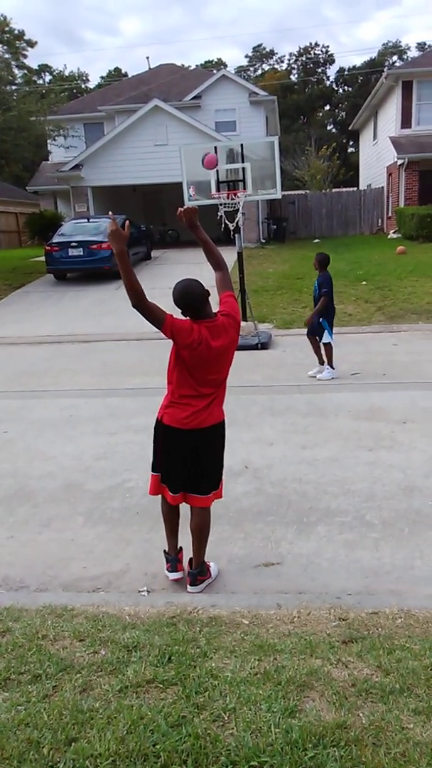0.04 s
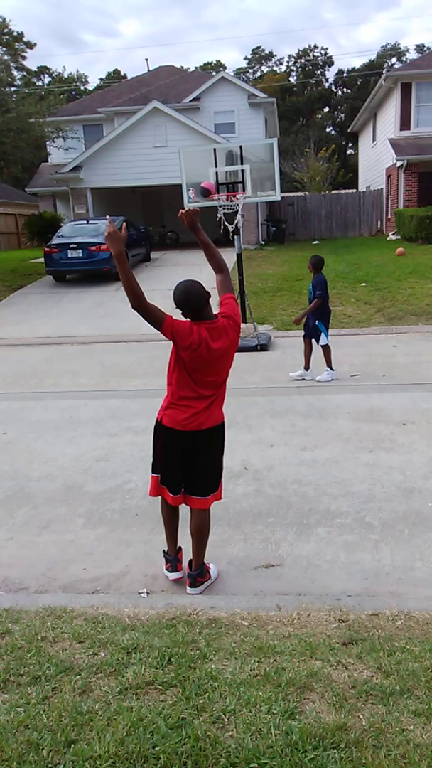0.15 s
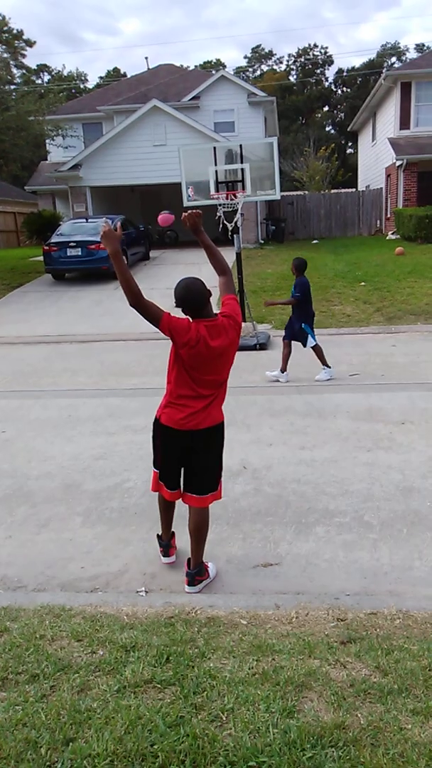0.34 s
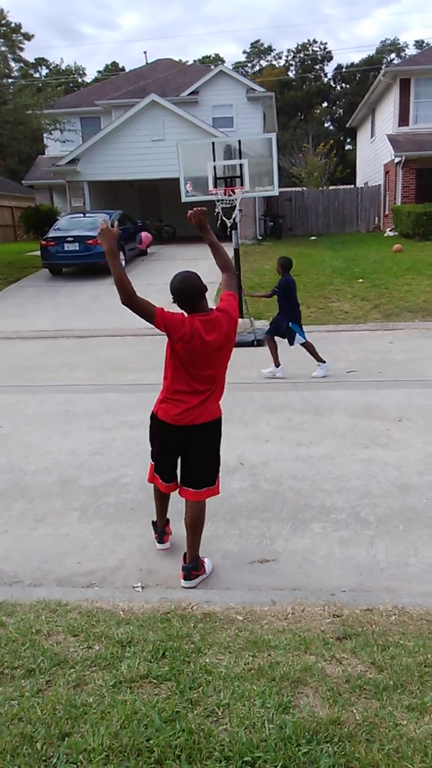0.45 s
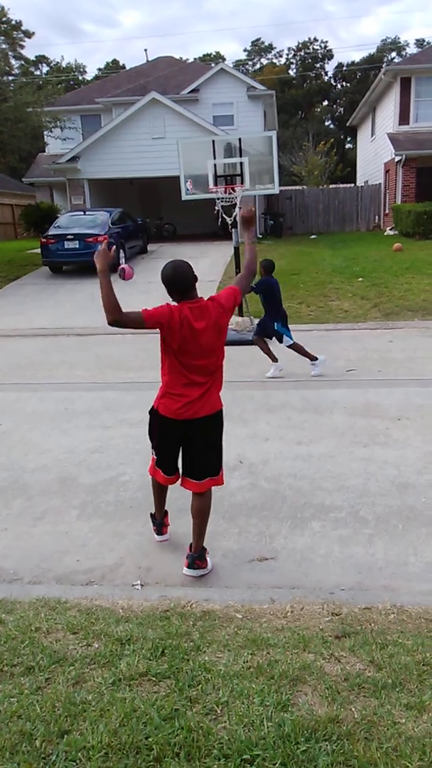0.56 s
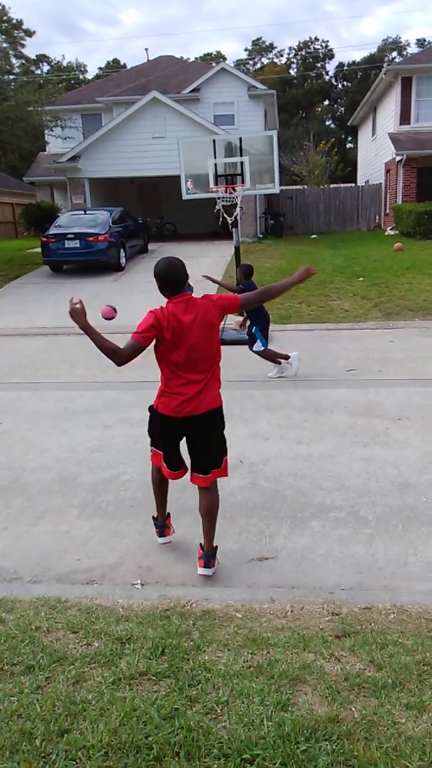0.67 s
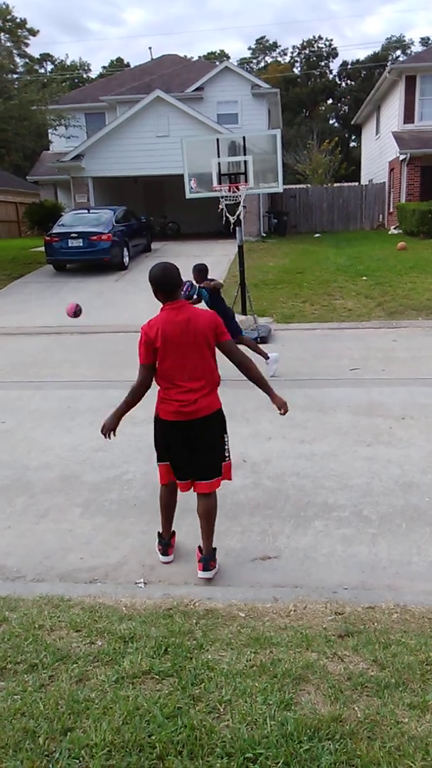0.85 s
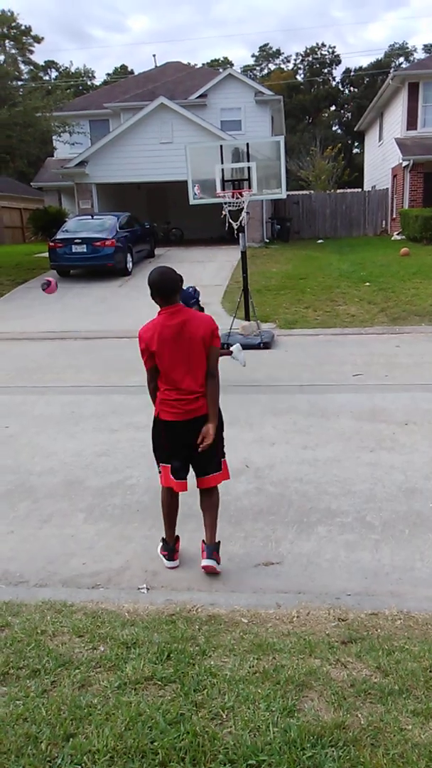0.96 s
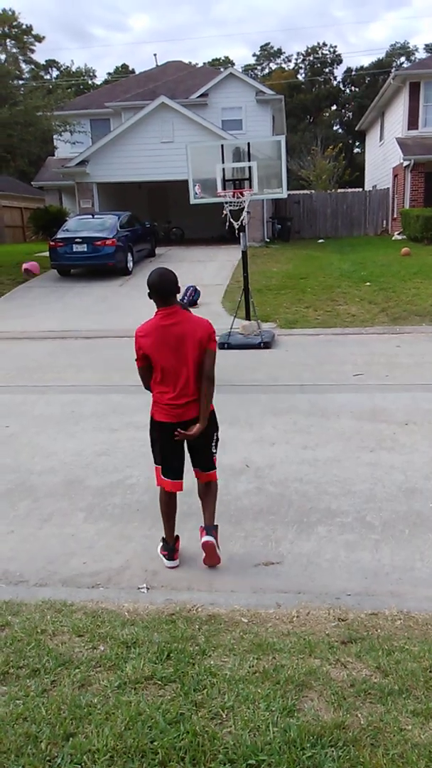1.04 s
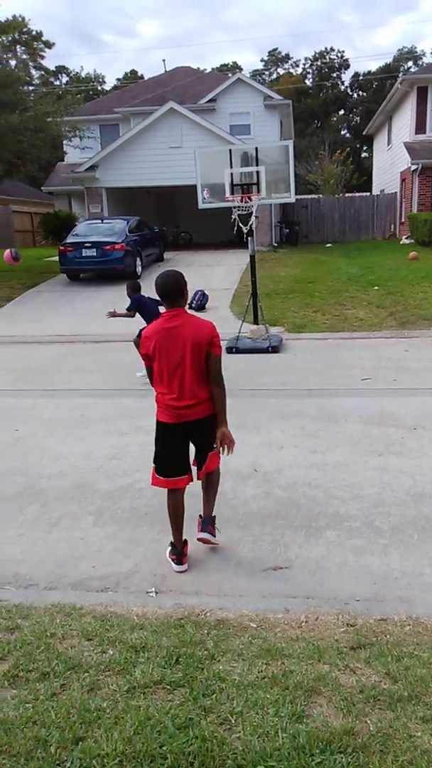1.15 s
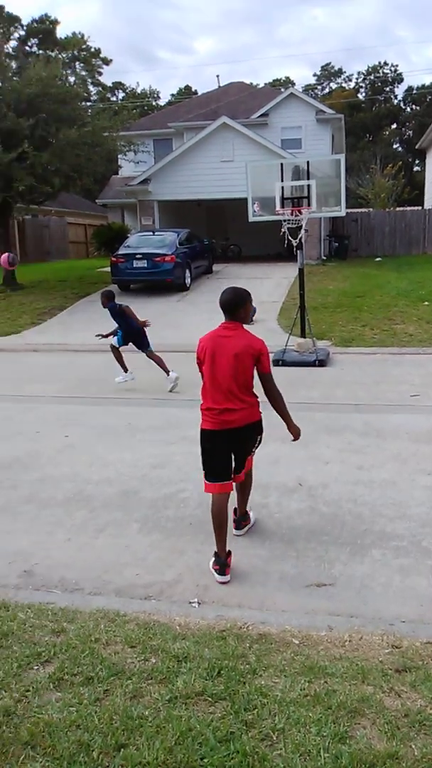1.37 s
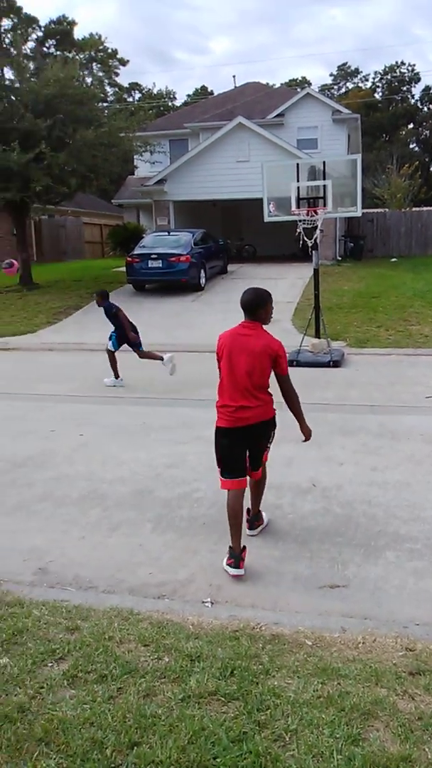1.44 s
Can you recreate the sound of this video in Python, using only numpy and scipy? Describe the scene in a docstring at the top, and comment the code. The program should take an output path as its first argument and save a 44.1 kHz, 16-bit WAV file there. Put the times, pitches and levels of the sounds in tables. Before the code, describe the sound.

A basketball hits a backboard with a rattling boom, then bounces once on pavement.

```python
"""A quiet street with a portable hoop. A ball hits the backboard: the panel booms and shudders,
loose fittings clack and ring the rim, small parts tick. The ball drops, smacks the pavement
once, and the house fronts echo the bounce. A fine high rustle, as of net and clothing, runs
alongside, over faint outdoor air, a low hum and one far tap."""
import sys
import numpy as np
from scipy import signal
from scipy.fft import rfft, irfft, next_fast_len
from scipy.io import wavfile
from scipy.ndimage import uniform_filter1d, map_coordinates

SR = 44100
rng = np.random.default_rng(int(sys.argv[2]) if len(sys.argv) > 2 else 0)


def wrap_up_sound(samples):
    """Save the sound to the file named by the first command line argument, as 16-bit audio."""
    columns = np.atleast_2d(samples).T
    # keep every value between -1 and 1, then stretch to whole-number steps
    tamed = np.clip(columns, -1, 1)
    steps = np.round(tamed * 32767).astype(np.int16)
    wavfile.write(sys.argv[1], SR, steps)


N = 66150
T = np.arange(N) / SR

# Stereo likeness. Each row: frequency in Hz, left-right correlation.
CORRELATION = [(100, 0.94), (330, 0.97), (600, 0.49), (1500, 0.45), (3000, 0.024), (12000, 0.021)]
# Fittings knocking as the board swings. Each row: start in seconds, level in dB, T60 in seconds.
CLACKS = [(0.222, -33.5, 0.23), (0.31, -34.5, 0.2), (0.404, -38.5, 0.42), (.462, -36.5, 0.25),
          (0.544, -41.5, 0.2), (0.565, -39.5, 0.27), (.615, -34.5, 0.15), (.632, -37, 0.12),
          (0.771, -49.5, 0.2)]


def amp(db):
    """Decibels to gain."""
    return 10 ** (np.asarray(db) / 20)


def unit(x):
    """Scale to RMS 1."""
    return x / np.sqrt(np.mean(x ** 2) + 1e-20)


def along(points, hz):
    """Interpolate (Hz, value) points on a log frequency axis."""
    knots_hz, values = np.transpose(points)
    return np.interp(np.log(hz + 1), np.log(knots_hz + 1), values)


def filtered(x, response):
    """Apply a frequency response, given as a function of Hz."""
    size = next_fast_len(N + SR // 2)
    return irfft(rfft(x, size) * response(np.fft.rfftfreq(size, 1 / SR)), size)[..., :N]


def noise(colour):
    """Stereo noise of RMS 1, near mono in the bass, wide in the treble."""
    def mid_side_gains(hz):
        angle = np.arccos(np.clip(along(CORRELATION, hz), -.999, .999)) / 2
        return amp(along(colour, hz)) * [np.cos(angle), np.sin(angle)]
    mid, side = filtered(rng.standard_normal((2, N)), mid_side_gains)
    return unit(np.array([mid + side, mid - side]))


def fade(t, t60_s):
    """Exponential decay."""
    return np.exp(-np.log(1000) * t / t60_s)


def strike(start_s, t60_s, rise_s):
    """Envelope of a blow."""
    age_s = np.maximum(T - start_s, 0)
    return fade(age_s, t60_s) * (1 - np.exp(-age_s / rise_s))


def ring(modes, start_s, rise_s):
    """Damped modes struck at start_s."""
    return sum(amp(db) * strike(start_s, t60_s, rise_s) * np.sin(2 * np.pi * hz * (T - start_s))
               for hz, db, t60_s in modes)


def band_decay(x, start_s, t60_curve):
    """From start_s, decay each frequency by a curve of (Hz, T60 in seconds) points."""
    hz, t, spectrum = signal.stft(x, SR, nperseg=1024)
    decay = fade(np.maximum(t - start_s, 0), along(t60_curve, hz)[:, None])
    return signal.istft(spectrum * decay, SR)[1][:, :N]


def outdoor_air(hum_hz=122.4):
    """Steady faint air noise and a low hum."""
    # Each row: frequency in Hz, relative density in dB.
    colour = [(25, -24), (64, -6), (130, -7), (400, -15.5), (700, -19.5), (1300, -27.5), (2500, -28),
              (4500, -45), (8000, -46), (10500, -28.5), (13000, -49), (15000, -73.5)]
    return amp(-63) * noise(colour) + amp(-60.5) * np.sin(2 * np.pi * hum_hz * T)


def far_tap():
    """One faint, dull noise burst."""
    # Each row: frequency in Hz, relative level in dB.
    colour = [(200, -29), (650, 11.5), (1500, -20), (6000, -23.5), (14000, -42.5)]
    return amp(-55) * strike(1.346, t60_s=0.057, rise_s=0.0015) * noise(colour)


def street_echoes(source):
    """Scattered reflections off the house fronts, plus a thin tail."""
    # Each row: delay in seconds, level in dB, low-pass corner in Hz.
    walls = [(0.009, -22.5, 5000), (.03, -20, 9000), (0.053, -16, 9000), (.1, -20, 2920),
             (0.14, -13.5, 280)]
    tail_t60 = [(100, 1), (400, 0.3), (1500, 0.78), (5000, 0.32), (12000, 0.57)]
    white = [(20, 0), (20000, 0)]
    response = amp(-15.5) * unit(band_decay(noise(white), 0, tail_t60))
    for delay_s, db, corner_hz in walls:
        scatter = unit(noise(white) * strike(delay_s, t60_s=0.043, rise_s=.001))
        response += amp(db) * filtered(scatter, lambda hz: 1 / (1 + 1j * hz / corner_hz) ** 2)
    response /= np.sqrt(N)  # unit RMS to unit energy
    return signal.fftconvolve(source, response, axes=1)[:, :N]


def rustle(grains_per_s=350, grain_db=2, patch_db=4.5):
    """High rustle, as of net and clothing: grainy in level, patchy in time and frequency."""
    # Each row: time in seconds, level in dB.
    levels = [(0, -56), (.09, -54.5), (.185, -41), (.225, -26.5), (.275, -36.5), (.295, -43.5),
              (.45, -45.5), (.53, -50), (.69, -47.5), (.75, -38), (.82, -50), (.87, -52.5), (.95, -48.5),
              (1.12, -54.5), (1.24, -75.5), (1.465, -77), (1.48, -68.5)]
    # Each row: frequency in Hz, relative level in dB.
    colour = [(300, -17.5), (1500, -27), (2600, -14.5), (3600, -17), (5500, -8), (7500, -9), (9800, -2),
              (11300, -1.5), (12500, -18), (14000, -17), (15000, -60.5)]
    grain = map_coordinates(rng.standard_normal(N // 10), [T * grains_per_s])  # smooth random curve
    spectrum = signal.stft(noise(colour), nperseg=512)[2]
    patches = uniform_filter1d(rng.standard_normal(spectrum.shape[1:]), size=5, axis=0)
    patches = unit(uniform_filter1d(patches, size=7, axis=1))
    hiss = unit(signal.istft(spectrum * amp(patch_db * patches))[1][:, :N])
    return amp(np.interp(T, *np.transpose(levels)) + grain_db * grain) * hiss


def ticks(ping_db=8, half_width_hz=490):
    """Each small part ticks with a hissy ping at its own pitch."""
    # Each row: start in seconds, level in dB, T60 in seconds, pitch in Hz.
    hits = [(.026, -36, 0.0095, 10200), (0.047, -36.5, 0.0098, 7050), (.1276, -42, 0.019, 5550),
            (0.2044, -26.5, 0.053, 8100), (0.224, -26, .03, 10200), (.2515, -38, 0.021, 11000),
            (0.26, -29, 0.083, 5650), (0.3224, -23.5, 0.041, 6450), (0.335, -34, .09, 6650),
            (0.375, -37, 0.082, 6600), (0.4248, -28, 0.055, 11000), (.4673, -31, 0.08, 6480),
            (0.483, -30, .025, 11400), (0.5693, -27.5, 0.039, 9850), (0.6284, -26, 0.032, 6730),
            (0.7732, -31, 0.043, 9700), (.835, -40.5, .02, 6560), (0.8498, -32.5, 0.027, 9200),
            (1.468, -53, 0.17, 10430)]
    # Each row: frequency in Hz, relative level in dB.
    colour = [(500, -12), (2500, -15.5), (4500, -11), (6200, -4), (7800, -7.5), (10000, -0.5),
              (11500, -1.5), (13000, -2.5), (14200, -21), (15300, -44.5)]
    hiss, out = noise(colour), 0
    for start_s, db, t60_s, pitch_hz in hits:
        ping = filtered(hiss, lambda hz: 1 + amp(ping_db) / (1 + ((hz - pitch_hz) / half_width_hz) ** 2))
        out += amp(db) * strike(start_s, t60_s, rise_s=.0004) * unit(ping)
    return out


def rim(scatter_db=3.5, rise_s=0.00038):
    """Every clack rings the steel rim anew, each mode with random strength and phase."""
    # Each row: frequency in Hz, level in dB relative to the clack, T60 in seconds.
    modes = [(524, -9, .2), (1045, -13, .18), (1265, -7, .16), (1325, -5, .2), (1685, -14, .14),
             (1940, -15, .14), (2347, -14, .14), (2532, -13, .14)]
    out = np.zeros((2, N))
    for start_s, clack_db, _ in CLACKS:
        first = int(start_s * SR)
        t = T[:min(N - first, SR // 3)]
        for hz, mode_db, t60_s in modes:
            gain = amp(clack_db + mode_db + scatter_db * rng.normal())
            stereo_spread_rad = np.arccos(along(CORRELATION, hz))
            phase = 2 * np.pi * rng.random() + stereo_spread_rad * rng.normal(size=(2, 1))
            envelope = fade(t, t60_s) * (1 - np.exp(-t / rise_s))
            out[:, first:first + len(t)] += gain * envelope * np.sin(2 * np.pi * hz * t + phase)
    return out


def fittings():
    """Loose fittings clack in broadband bursts."""
    # Each row: frequency in Hz, relative level in dB.
    colour = [(200, 7), (520, 2), (700, -4), (1100, -0.5), (1320, -4), (1600, -7), (2600, -5.5),
              (4000, -10), (7000, -10.5), (11000, -5), (15000, -28)]
    envelope = sum(amp(db) * strike(start_s, t60_s, rise_s=0.0024) for start_s, db, t60_s in CLACKS)
    return envelope * noise(colour)


def bounce(contact_s, squash_s=.0031):
    """The skin slaps the pavement; the flattening ball then scuffs grit and thuds hollowly."""
    # Skin landing, flattening, leaving. Each row: lag in seconds, level in dB, T60 in seconds.
    slaps = [(0, -9.5, 0.0062), (.0036, -14, .004), (.0095, -30.5, .008), (.013, -28, 0.011)]
    # Each row of both spectra: frequency in Hz, relative level in dB.
    slap_colour = [(300, -1.5), (900, -23), (1500, -4.5), (2500, 3.5), (3000, -14), (3800, 8), (5000, -5.5),
                   (7000, -1.5), (10000, 2), (12000, -8), (13500, -31.5), (16000, -36.5)]
    scuff_colour = [(250, 5.5), (550, -11), (1000, -5), (1500, -4), (2500, -12), (3200, -21), (6000, -16),
                    (14000, -46)]
    # Each row: frequency in Hz, level in dB, T60 in seconds.
    ball_modes = [(68.6, -17.5, 0.11), (126.3, -11, 0.069), (257, -10.5, 0.041), (411.6, -31.5, 0.15),
                  (786, -37, 0.1), (990, -44.5, 0.12), (1247, -43.5, .2), (1427, -37, 0.087),
                  (1924, -43.5, 0.13), (2560, -41.5, 0.066), (3800, -44, 0.069)]
    slap = sum(amp(db) * strike(contact_s + lag_s, t60_s, rise_s=.00005) for lag_s, db, t60_s in slaps)
    flat_s = contact_s + squash_s
    scuff = amp(-21) * strike(flat_s, t60_s=.055, rise_s=0.00034)
    thud = ring(ball_modes, flat_s, rise_s=.0017)
    return slap * noise(slap_colour) + scuff * noise(scuff_colour) + thud


def backboard(hit_s, sway_db=-28.5, sway_t60_s=3.38, shudder_rise_s=0.004):
    """The panel booms in close, beating modes over a shudder of weaker ones; the frame throbs on."""
    # Each row: frequency in Hz, level in dB, T60 in seconds.
    panel_modes = [(71.5, -25, 2.02), (83.1, -31, 2.4), (106.4, -35, 3.2), (117.9, -18.5, 0.63),
                   (126.33, -25, 1.81), (139.2, -30, 0.86), (156.2, -47, 0.83), (221.3, -26.5, 1.34),
                   (224.7, -23, 0.31), (278.4, -19, 1.295), (287.3, -21, 1.38), (311, -14.5, 1.104),
                   (324.5, -26.5, 1.27), (342.5, -17, 1.155), (350.1, -17, 0.76), (525.7, -22.5, .7),
                   (768, -37.5, 1)]
    # The crowd of weak modes. Each row: frequency in Hz, relative density in dB.
    shudder_colour = [(30, -15.5), (70, -1.5), (150, 2.5), (200, -10), (330, 2), (400, -4.5), (470, -10.5),
                      (540, -8.5), (660, -25), (820, -16), (1100, -28), (1320, -21.5), (1600, -32),
                      (4000, -27), (9000, -56.5)]
    shudder_t60 = [(100, 1.0), (400, 1), (1300, 1), (5000, 0.34)]
    frame_modes = [(hz, sway_db, sway_t60_s) for hz in (55.5, 64.15)]
    boom = ring(panel_modes + frame_modes, hit_s, rise_s=0.03)
    onset = 1 - np.exp(-np.maximum(T - hit_s, 0) / shudder_rise_s)
    shudder = onset * band_decay(noise(shudder_colour), hit_s, shudder_t60)
    return boom + amp(-19) * shudder


def scene(pan_db=.5):
    """Hoop, ball and street, slightly to the left."""
    hoop = backboard(hit_s=.222) + fittings() + ticks() + rim()
    ball = bounce(contact_s=.8958)
    mix = hoop + ball + rustle() + street_echoes(ball) + far_tap() + outdoor_air()
    return mix * amp([[pan_db], [-pan_db]])


def record(dry):
    """Brick-wall low-pass."""
    cutoff_hz = 16300
    return filtered(dry, lambda hz: hz < cutoff_hz)


dry = scene()
out = record(dry)
wrap_up_sound(out)
```